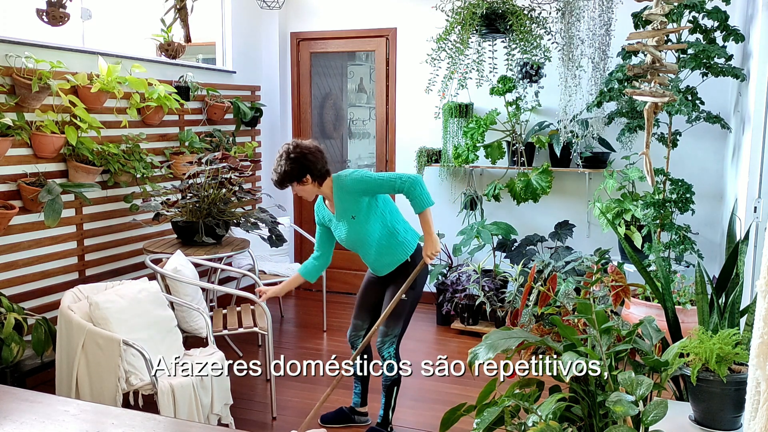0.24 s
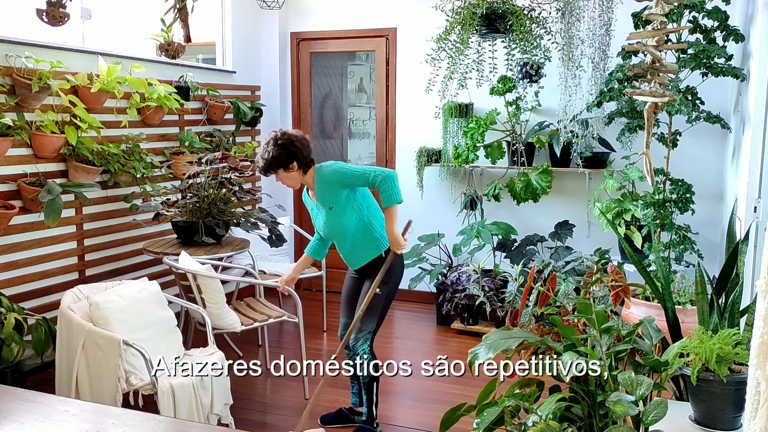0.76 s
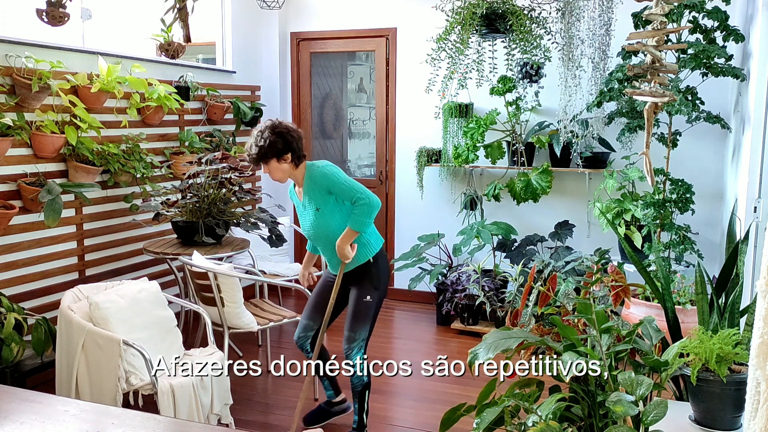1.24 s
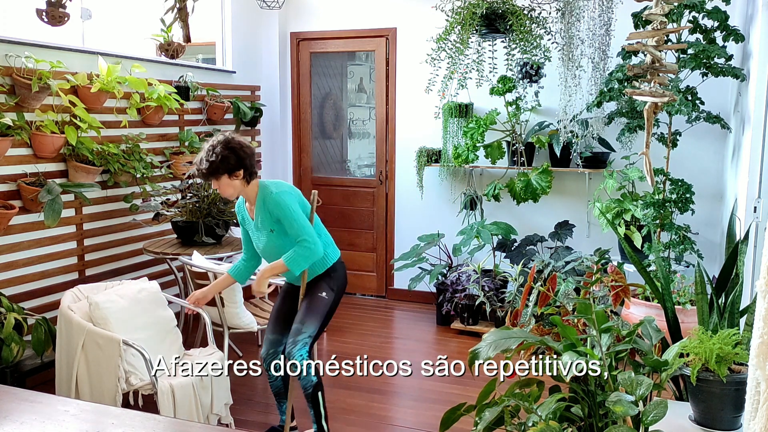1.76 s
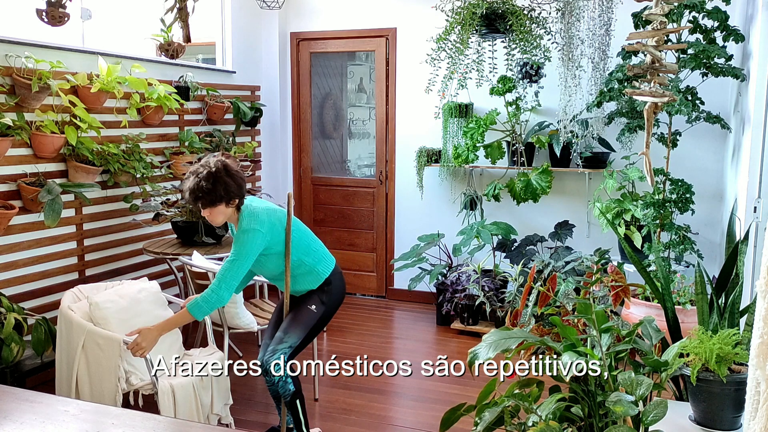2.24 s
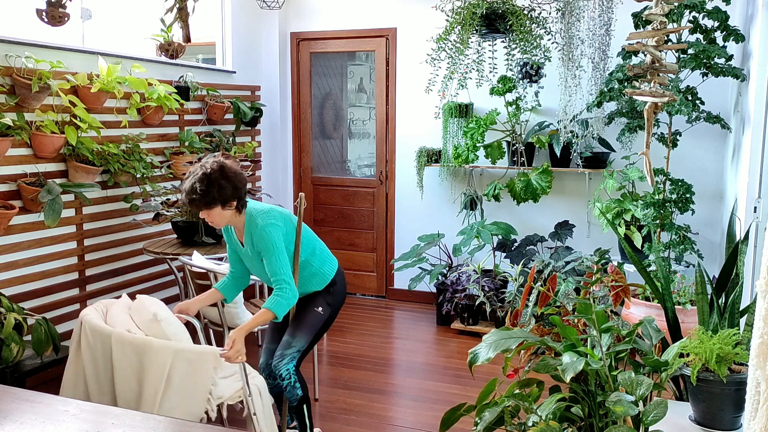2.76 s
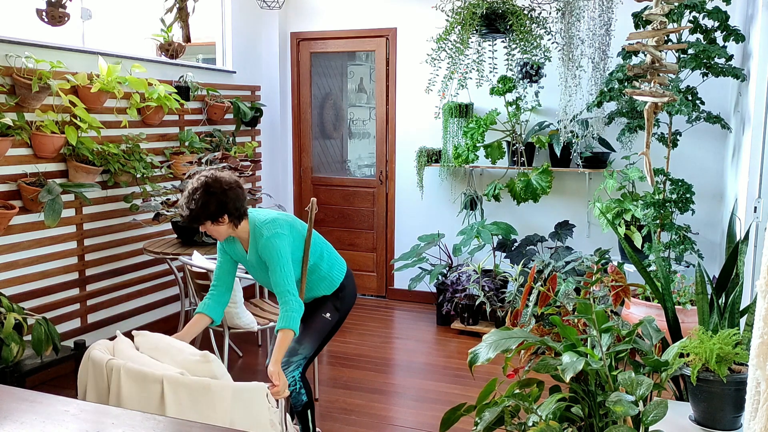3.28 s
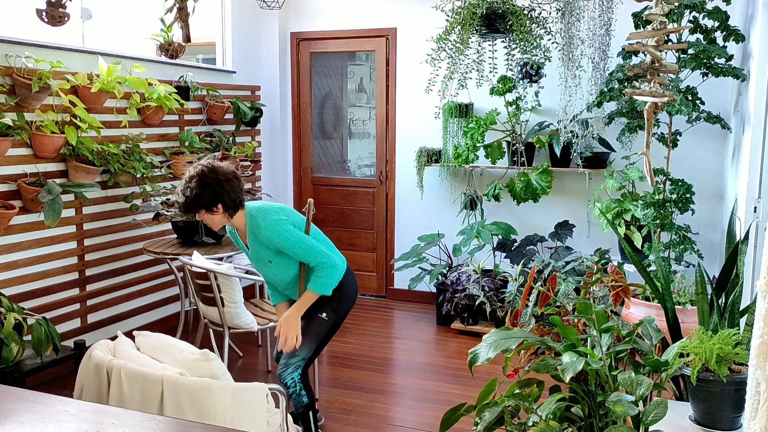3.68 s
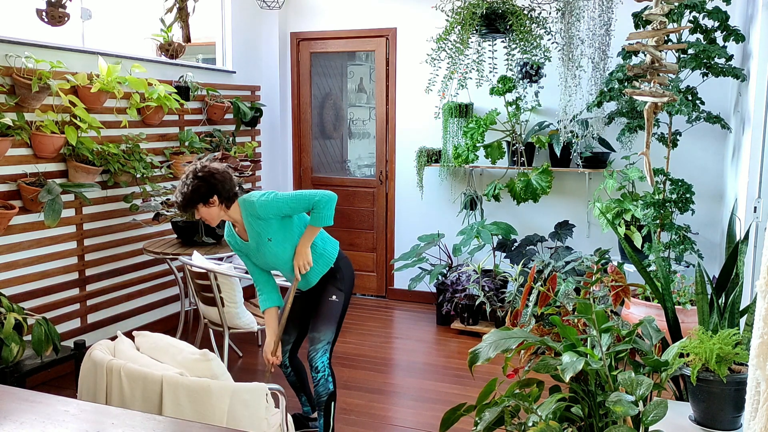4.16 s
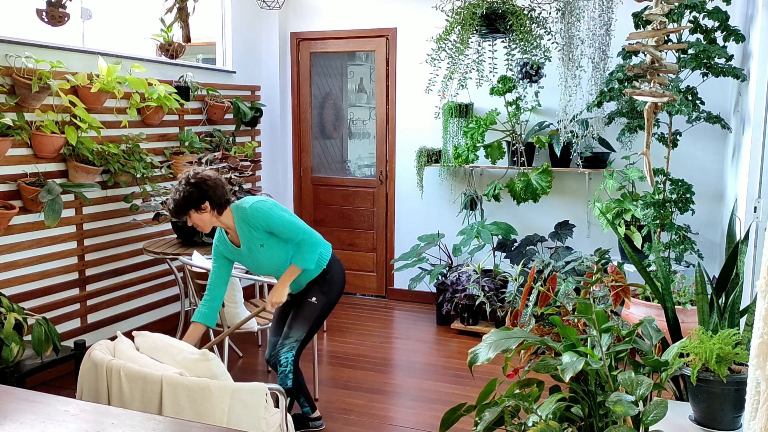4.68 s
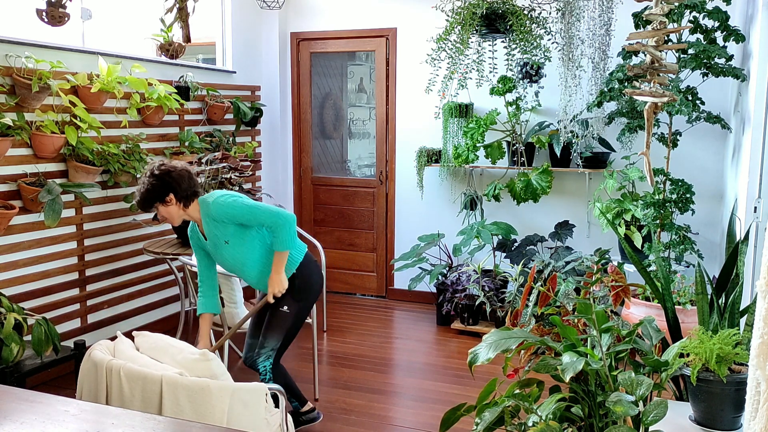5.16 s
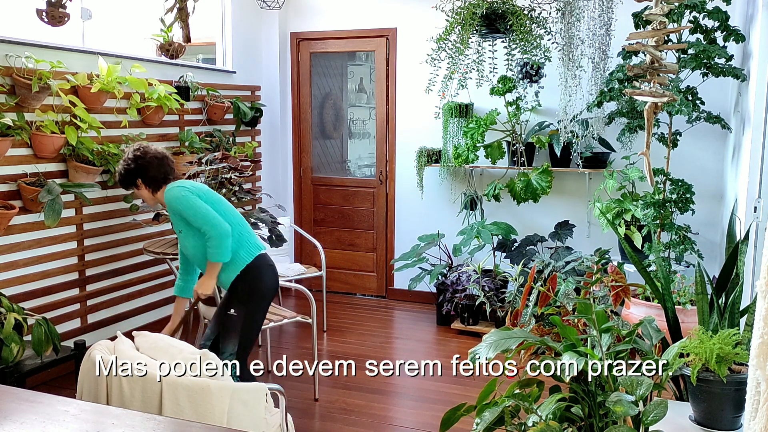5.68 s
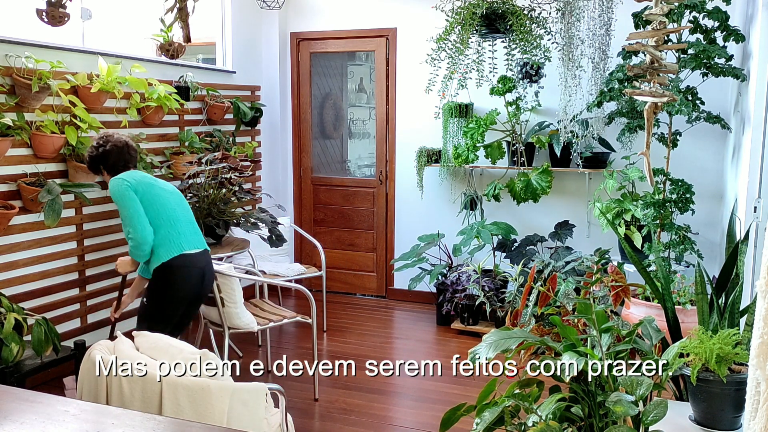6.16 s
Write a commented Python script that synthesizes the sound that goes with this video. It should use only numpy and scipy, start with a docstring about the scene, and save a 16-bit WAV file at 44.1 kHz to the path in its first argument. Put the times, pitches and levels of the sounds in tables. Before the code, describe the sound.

Small hard-walled room, stereo microphone hearing clear reflections. Faint bristle fizz and small taps lead into a stuttering chair drag and a cluster of thuds. After a pause comes one sharp, ringing metal clack; later an armchair bumps down dull and woody. Near the end a broom scrubs the boards in three rapid firm pushes with knocks, then light whisking, all over a low wash and a thin bending drone.

```python
"""Small, hard-walled room with a wooden floor, being swept.
A tube chair is dragged aside in stick-slip shoves and set down; a broom handle cracks once on a metal tube.
An armchair thumps and rocks on the boards as filtered blows, ringing modes and short thuds.
Bristles scrub by stick-slip and whisk as random snaps. Coloured noise makes a low wash of air;
wavering sines make a faint hum and drone."""
import sys
import numpy as np
from scipy import signal
from scipy.fft import rfft, irfft
from scipy.io import wavfile
from scipy.ndimage import uniform_filter1d

SR = 44100
rng = np.random.default_rng(int(sys.argv[2]) if len(sys.argv) > 2 else 0)


def master_out(mix):
    """Clip the mix to full scale and print it as 16-bit PCM to the path in sys.argv[1]."""
    frames = np.transpose(np.atleast_2d(mix))
    ceiling = np.clip(frames, -1, 1)
    pcm = np.round(ceiling * 32767).astype(np.int16)
    wavfile.write(sys.argv[1], SR, pcm)


N = 283665


def amp(db):
    """Decibels to gain."""
    return 10 ** (np.asarray(db) / 20)


def evened(x):
    """Scales to rms 1."""
    return x / np.sqrt(np.mean(x ** 2) + 1e-20)


def read(points, hz):
    """Interpolates a table along a log-frequency axis."""
    f, value = np.transpose(points)
    return np.interp(np.log(hz + 1), np.log(f + 1), value)


def add(mix, s, sound):
    """Mixes a sound in at time s."""
    part = mix[:, round(s * SR):][:, :sound.shape[1]]
    part += sound[:, :part.shape[1]]


def response(spectrum, size=4096):
    """Minimum-phase impulse response of a spectrum, by folding its cepstrum."""
    hz = np.fft.rfftfreq(size, 1 / SR)
    level_db = np.maximum(read(spectrum, hz), -100)
    cepstrum = irfft(np.log(amp(level_db)))
    cepstrum[1:size // 2] *= 2
    cepstrum[size // 2 + 1:] = 0
    return irfft(np.exp(rfft(cepstrum)))


def coloured(x, spectrum):
    """Passes a sound through a spectrum, at rms 1."""
    return evened(signal.oaconvolve(x, response(spectrum))[:len(x)])


def drift(cutoff_hz):
    """Slow random wander of rms 1: noise under a Gaussian low-pass."""
    hz = np.fft.rfftfreq(N, 1 / SR)
    noise = rfft(rng.standard_normal(N))
    return evened(irfft(noise * np.exp(-(hz / cutoff_hz) ** 2), N))


def diffuse(count):
    """Noise from all sides: how alike it is at the two ports depends on frequency."""
    # likeness of the two microphone ports: hz, correlation
    likeness = [(50, 0.69), (180, 0.9), (350, 0.76), (700, 0.31), (1300, -0.08), (3000, -0.16),
                (8000, 0.92), (12000, 1)]
    a, b = rfft(rng.standard_normal((2, count)))
    same = np.clip(read(likeness, np.fft.rfftfreq(count, 1 / SR)), -1, 1)
    mid = a * np.sqrt((1 + same) / 2)
    side = b * np.sqrt((1 - same) / 2)
    return irfft(np.array([mid + side, mid - side]), count)


def room(x, direct_db, hold_s=0.017, lumps_db=0.5):
    """Direct sound, a plateau of uneven early reflections, then a decaying tail; drawn afresh per call."""
    # reverberation: hz, t60_s
    reverberation = [(100, 0.79), (300, 0.25), (900, 0.48), (3000, 0.55), (8000, 0.44), (15000, 0.27)]
    hz, t, z = signal.stft(diffuse(SR), SR, nperseg=256)
    t60_s = read(reverberation, hz)[:, None]
    decay = amp(-60 * np.maximum(t - hold_s, 0) / t60_s)
    tail = signal.istft(z * decay, SR, nperseg=256)[1]
    t = np.arange(tail.shape[1]) / SR
    lumps = evened(uniform_filter1d(rng.standard_normal(len(t)), size=50))
    tail *= (1 - np.exp(-t / 0.00078)) * amp(lumps_db * lumps * np.exp(-t / 0.034))
    tail /= np.sqrt(np.sum(tail ** 2) / 2)
    tail[[0, 1], [2, 0]] += amp(direct_db)  # direct path: right port first, left 2 samples later
    return signal.fftconvolve(x[None], tail, axes=1)[:, :N]


def blow(spectrum):
    """One impact, with the energy of 50 ms at rms 1."""
    energy = .05 * SR
    push = response(spectrum)
    return push * np.sqrt(energy / np.sum(push ** 2))


def contact(decay_s, size=1024):
    """Chatter of a hard contact: a fading noise burst of even colour, with energy 1."""
    fade = np.exp(-np.arange(size) / SR / decay_s)
    z = rfft(rng.standard_normal(size) * fade)
    smooth_power = uniform_filter1d(abs(z) ** 2, size=15)
    burst = irfft(z / np.sqrt(smooth_power)) * np.sqrt(fade)
    return burst / np.linalg.norm(burst)


def ring(modes, spread_db=0):
    """Free ringing after a blow: each mode decays at its own rate, with port phases closest in the bass."""
    t = np.arange(int(.5 * SR)) / SR
    out = np.zeros((2, len(t)))
    for hz, db, t60_s in modes:
        apart = rng.uniform(-np.pi, np.pi) * min(hz / 1400, .5) * np.array([[1], [-1]])
        level_db = db + spread_db * rng.standard_normal()
        decay = amp(level_db - 60 * t / t60_s) / np.sqrt(t60_s)
        out += decay * np.sin(2 * np.pi * hz * t + apart)
    return out * (1 - np.exp(-t / 0.0015))


def grains(per_s, spread_db):
    """Tiny random snaps of uneven size and either sign."""
    size = amp(spread_db * np.minimum(rng.exponential(1, N), 4))
    size *= rng.choice([-1, 1], N)
    return size * (rng.random(N) < per_s / SR)


def strokes(rows, attack_s, release_s):
    """Gain of rubbing strokes: each builds up, holds to the end of its length and dies away."""
    t, gain = np.arange(N) / SR, np.zeros(N)
    for start_s, length_s, db in rows:
        rise = np.clip((t - start_s) / attack_s, 0, 1)
        fall = np.exp(-np.maximum(t - start_s - length_s, 0) / release_s)
        gain = np.maximum(gain, amp(db) * rise * fall)
    return gain


def sweep():
    """Bristles stick and slip over coarse grit under firm pushes, and fizz as random snaps in light strokes."""
    # firm pushes: start_s, length_s, relative_level_db
    pushes = [(4.87, 0.082, -41.5), (4.942, 0.062, -26), (5.03, 0.061, -31.5)]
    # light strokes: start_s, length_s, relative_level_db
    light_strokes = [(-.08, 0.093, -54), (.31, 0.14, -58), (.55, 0.28, -46.5), (.74, 0.31, -47.5),
                     (1.49, 0.14, -56), (1.98, 0.3, -57.5), (2.47, 0.026, -51), (3.53, 0.041, -58),
                     (3.93, 0.24, -55), (4.47, 0.17, -54.5), (4.67, 0.42, -54.5), (5.16, 0.75, -51.5),
                     (5.6, 0.18, -50.5), (5.95, 0.29, -54), (6.18, 0.27, -48)]
    # colour of the firm scrub: hz, relative_db_per_hz
    broom = [(53, -54), (90, -28), (165, -1), (259, -15), (527, -6), (700, -8), (1690, -17), (2400, -12.5),
             (4160, -12.5), (5200, -20.5), (6600, -18.5), (8500, -39), (12000, -33), (15500, -39)]
    # colour of the light fizz: hz, relative_db_per_hz
    bristles = [(700, -4), (1300, 4.5), (2000, -5), (5450, -9), (6620, -3), (7200, -8), (8800, -7),
                (12000, -5), (15500, -12.5)]
    slips_per_s, jitter = 190, .3
    surge_db, surge_hz = 3.5, 55

    turns = np.cumsum(slips_per_s * np.exp(jitter * drift(90))) / SR
    slips = np.diff(np.floor(turns), prepend=0)  # one impulse per whole turn
    slips = signal.fftconvolve(slips, contact(.0009))[:N] * amp(surge_db * drift(surge_hz))
    rub = evened(slips) + 0.42 * evened(grains(900, spread_db=3.5))
    firm = coloured(rub, broom) * strokes(pushes, attack_s=0.017, release_s=0.0057)

    light = coloured(grains(3000, spread_db=4.5), bristles)
    light *= strokes(light_strokes, attack_s=0.004, release_s=0.12) * amp(2 * drift(33))
    firm_heard = amp(-1.5) * room(firm, direct_db=-0.5, hold_s=0.0037)
    light_heard = amp(3.0) * room(light, direct_db=-9.0)
    return firm_heard + light_heard


def drag():
    """Chair feet stick and slip at each shove's pace, pushing the boards; a leg groans at its own pitch."""
    # shoves: start_s, length_s, relative_level_db, slips_per_s, groan_hz, groan_peak_db
    shoves = [(0.691, 0.079, -30, 104.5, 323, -42), (.745, 0.111, -28, 99, 395, -37),
              (0.804, 0.023, -30, 98, 289.4, -27.5), (0.878, 0.0283, -29.5, 135, 255.6, -29.5),
              (0.954, .05, -24, 92, 367.7, -29), (1.076, 0.029, -30.5, 110, 400, -43)]
    # colour of the feet on the boards: hz, relative_db_per_hz
    feet = [(70, -58), (120, -36), (165, -21), (210, -15.5), (275, 3.5), (325, -5.5), (370, 4), (430, -0.5),
            (490, -14), (600, -7), (720, -9), (1000, -19), (1400, -30.5), (4000, -34), (9000, -69)]
    attack_s, release_s = 0.0083, 0.013
    slip_jitter = .13
    start_s, length_s, level_db, slips_per_s, groan_hz, groan_db = np.transpose(shoves)

    pace = np.interp(np.arange(N) / SR, start_s + length_s / 2, slips_per_s)
    turns = np.cumsum(pace * np.exp(slip_jitter * drift(40.2))) / SR
    slips = np.diff(np.floor(turns), prepend=0) * amp(1.5 * drift(80))
    push = evened(slips) + 0.32 * evened(grains(720, spread_db=14.0))
    force = strokes(zip(start_s, length_s, level_db), attack_s, release_s)
    scrape = coloured(push, feet) * force

    wobble_s = np.cumsum(1 + .025 * drift(50)) / SR  # time base that wavers in speed
    groan = np.zeros(N)
    for hz, *row in zip(groan_hz, start_s, length_s, groan_db):
        groan += strokes([row], attack_s, release_s) * np.sin(2 * np.pi * hz * wobble_s)
    return amp(-3.5) * room(scrape, direct_db=-3.5, hold_s=0.0052) + groan


def knocks():
    """Chair, armchair and broom strike the boards, and a few light footsteps or taps fall between; each blow
    has its own hardness and chatter and rings with one thing's modes."""
    # blows and bounces: start_s, level_db, thud_db (200 Hz), clack_db (1800 Hz), tick_db (8000 Hz), # direct_db
    # (against the room), thing that rings (the light taps at 1.52, 1.99, 3.80, 3.82, 5.24 and 5.83 s ring with
    # the broom's modes)
    blows = [(.544, -51.5, 0, 17, 33, -11, "chair"), (.573, -37, -2, 4, 14, -12, "chair"),
             (.603, -31.5, -9, 17, 26, -18, "chair"), (.615, -39.5, -2, 16, 15, -6, "chair"),
             (.629, -32, 5.5, 18, 5, -17, "chair"), (.657, -36.5, 4, 12, 8, -4, "chair"),
             (.698, -42.5, -2, 13, 11, -6, "chair"), (1.171, -22, -19, 0.5, 2.5, -13.5, "chair"),
             (1.179, -20.5, -3.5, -2, -5, -5, "chair"), (1.194, -27, -3.5, 3.5, -8, -10, "chair"),
             (1.207, -23.5, -4, -3, -8, -2, "chair"), (1.237, -26, -10, -12, -14, -4, "chair"),
             (1.524, -43.5, 6, 18, 11.5, -14, "broom"), (1.989, -48, 2, 18, 7, -16, "broom"),
             (3.312, -26.5, -10, 12, 7.5, -16, "armchair"), (3.338, -29, 1, 13, 12, -15, "armchair"),
             (3.375, -23.5, -3.5, 14, 9, -11, "armchair"),
             (3.384, -16.5, -3.5, 9.5, 2.5, -13.5, "armchair"), (3.399, -22, -5.5, 3.5, 5, -3, "armchair"),
             (3.413, -25.5, 2, -1, -1, -15, "armchair"), (3.439, -27.5, 0, -16, -11, 0, "armchair"),
             (3.463, -31, -6, -6, -9, -0.5, "armchair"), (3.798, -46.5, 14, 20.5, 18.5, -14, "broom"),
             (3.824, -48, -20, 13, 23, -11, "broom"), (4.874, -31, -0.5, -1, 9.5, -13, "broom"),
             (4.881, -29, -10, 6, 4, -11, "broom"), (4.943, -36, 8, 20.5, 24.5, -16, "broom"),
             (4.956, -35.5, 7.5, 19, 23, -15, "broom"), (4.972, -37.5, 2, 16, 17, -5, "broom"),
             (4.997, -32, 6.5, 15.5, 4, -6, "broom"), (5.039, -27.5, -9, 13, -5, -14, "broom"),
             (5.046, -32, -14, -9, -11, 3, "broom"), (5.055, -33.5, -6, 8, -2, -4.5, "broom"),
             (5.07, -38.5, -3, 18, 6, -4, "broom"), (5.085, -41, -8, 18, 0, -4, "broom"),
             (5.239, -38, -16, -18, 12, -9, "broom"), (5.831, -40, -1, -7, -13, -18, "broom")]
    # colour of a blow on the boards: hz, relative_db_per_hz
    boards = [(29, -49), (50, -37), (100, -21.5), (170, -11.5), (230, -2), (280, 0), (380, 2), (551, -3),
              (981, -11.5), (1300, -17), (1700, -24.5), (2500, -31), (3300, -37), (8500, -39.5),
              (15500, -52)]
    # ringing of each thing on the floor: hz, strength_db, t60_s
    chair_modes = [(289, -19, .33), (406, -7.5, 0.16), (494, -18, .39), (618, -17, 0.44), (739, -16, .45),
                   (900, -21, 0.6), (982, -24, 0.45), (1330, -32, .3), (1470, -31, 0.3), (1750, -29, 0.32)]
    armchair_modes = [(293, -5.5, 0.28), (340, -10, 0.43), (368, -12.5, 0.28), (589, -20, 0.46),
                      (727, -22, 0.51), (835, -14.5, .38), (985, -27, 0.52), (1306, -24, .38),
                      (1470, -26, 0.36), (2020, -43, 0.37)]
    broom_modes = [(461, -17, 0.42), (535, -8.5, 0.39), (697, -19, .3), (1680, -25.5, 0.39),
                   (2470, -31.5, 0.26)]
    modes = {"chair": chair_modes, "armchair": armchair_modes, "broom": broom_modes}

    out = np.zeros((2, N))
    treble = signal.butter(3, 2500, "high", fs=SR, output="sos")
    for s, db, thud_db, clack_db, tick_db, direct_db, thing in blows:
        hardness = response([(200, thud_db), (450, 0), (1800, clack_db), (8000, tick_db)])
        hit = signal.fftconvolve(blow(boards), hardness)
        chatter = signal.fftconvolve(hit, contact(0.0035))[:len(hit)]
        chatter = signal.sosfilt(treble, chatter)
        ringing = signal.fftconvolve(ring(modes[thing], spread_db=3.0), hardness[None], axes=1)
        add(out, s, amp(db) * room(hit + 0.87 * chatter, direct_db))
        add(out, s, amp(db) * ringing)
    return out


def rocking():
    """The armchair settles on one leg after another: each landing is a dull thud a few cycles long."""
    # landings: start_s, relative_level_db
    landings = [(3.393, -18), (3.41, -13.5), (3.434, -16), (3.459, -21)]
    thud_hz, thud_s = 350, 0.0137
    t, out = np.arange(0, thud_s, 1 / SR), np.zeros((2, N))
    thud = np.sin(np.pi * t / thud_s) ** 2 * np.sin(2 * np.pi * thud_hz * t)
    for s, db in landings:
        add(out, s, 2 * amp(db) * thud[None])
    return out


def clack():
    """The handle cracks once on a metal tube: early echoes, strong modes, dense random partials, room answer."""
    # crack and its early echoes: start_s, relative_level_db
    arrivals = [(2.3, -6.5), (2.3077, -9.5), (2.312, -17), (2.325, -10.5), (2.3365, -9), (2.35, -16)]
    # colour of the crack: hz, relative_db_per_hz
    tube = [(120, -32), (250, -8), (500, -6), (1000, -5), (1500, -10), (2500, -9.5), (4400, -14.5),
            (5500, -5.5), (7000, -3), (7800, -0.5), (9000, -6.5), (9400, -13), (9750, -19), (10400, -14),
            (11500, -8.5), (14500, -13), (15500, -28)]
    # ringing of the tube: hz, strength_db, t60_s
    tube_modes = [(3450, -33, 0.34), (4280, -22, .3), (4613, -22.5, 0.68), (5170, -15, 0.46),
                  (5399, -13, 0.39), (5360, -22, .36), (5862, -15, 0.33), (6210, -19, .45),
                  (6500, -20, .34), (6788, -15, .42), (7700, -9, .36), (7700, -7, .33), (7946, -12, .3),
                  (8065, -12, .33), (8500, -10.5, .35), (8500, -13, .35), (8900, -13, .31),
                  (8800, -12, 0.36), (11770, -17, .29), (12620, -20, 0.42), (14750, -19, .25)]
    clack_db, room_db = -18.5, -4.5  # room_db is relative to clack_db
    partials_db, partials_t60_s = -13, 0.33  # level relative to the crack's spectrum

    crack = blow(tube)
    thin = signal.fftconvolve(crack, response([(500, -8), (3000, -15), (7500, -0.5), (12000, 0.0)]))
    # dense random ringing partials
    partials_hz = np.linspace(2500, 15000, 80) + rng.uniform(-70, 70, 80)
    partials = [(hz, partials_db + read(tube, hz), partials_t60_s) for hz in partials_hz]
    metal = ring(tube_modes) + ring(partials, spread_db=3.5)
    out = np.zeros((2, N))
    for s, db in arrivals:
        straight = np.array([signal.fftconvolve(thin, contact(.0016)) for port in range(2)])
        add(out, s, amp(clack_db + db) * straight)
        add(out, s, amp(clack_db + db - 0.5) * metal)
    answer = room(crack, direct_db=-32, hold_s=0.06, lumps_db=3.0)
    add(out, arrivals[0][0] + .003, amp(clack_db + room_db) * answer)
    return out


def background():
    """A low wash of air, a faint steady hum, and a thin drone that slowly bends in pitch."""
    # colour of the air: hz, relative_db_per_hz
    air_colour = [(15, -44), (25, -39.5), (101, -9.5), (156, -9), (240, -8), (281, -8.5), (322, -4),
                  (355, -6.5), (410, -9.5), (445, -12), (782, -15), (1750, -23.5), (2200, -32),
                  (2620, -26.5), (3000, -34.5), (7910, -41.5), (10100, -39), (15500, -40)]
    # steady hum: hz, rms_level_db
    hum_tones = [(102.3, -59.5), (239.5, -54.5), (411, -53.5), (793, -66.5)]
    # bending drone: time_s, pitch_hz, rms_level_db
    drone_path = [(0, 326, -44.5), (.7, 318.7, -59.5), (1.4, 316.6, -50.5), (2.8, 318.9, -44.5),
                  (3.8, 316, -45.5), (4.7, 323.3, -51), (5.4, 324.9, -52.5), (6.4, 331.4, -52.5)]
    air_level_db = -41

    air = np.array([coloured(port, air_colour) for port in diffuse(N)])
    air *= amp(air_level_db + .5 * drift(39))
    t, hum = np.arange(N) / SR, np.zeros(N)
    for hz, db in hum_tones:
        hum += amp(db + 1.5 * drift(3)) * np.sin(2 * np.pi * hz * t + .4 * drift(2))

    time_s, pitch_hz, level_db = np.transpose(drone_path)
    turns = np.cumsum(np.interp(t, time_s, pitch_hz)) / SR
    drone_gain = amp(np.interp(t, time_s, level_db) + 1.5 * drift(5))
    drone = drone_gain * np.sin(2 * np.pi * turns + .3 * drift(4))
    return air + np.sqrt(2) * (hum + drone)  # sqrt(2): rms to peak


def scene():
    """All that sounds in the room."""
    return sweep() + drag() + knocks() + rocking() + clack() + background()


def record(dry):
    """Each microphone port colours the treble in its own way; then a low-pass sets the band limit."""
    # colour of the ports: hz, left_db, right_db
    port_colours = [(3500, -0.5, 0), (7030, -6, -4), (6950, -1, -9), (7600, -8, -2), (9040, -8.5, 5),
                    (9620, -0.5, -5.5), (10460, 2.5, -5), (11500, -8, -5.5), (11500, 2, -6),
                    (13100, -6, -6)]
    edge_hz = 15700
    hz, left_db, right_db = np.transpose(port_colours)
    ports = np.array([response(np.column_stack([hz, db])) for db in (left_db, right_db)])
    heard = signal.oaconvolve(dry, ports, axes=1)[:, :N]
    edge = signal.firwin(511, edge_hz, window=("kaiser", 9), fs=SR)
    return signal.oaconvolve(heard, edge[None], "same", axes=1)


dry = scene()
out = record(dry)
master_out(out)
```